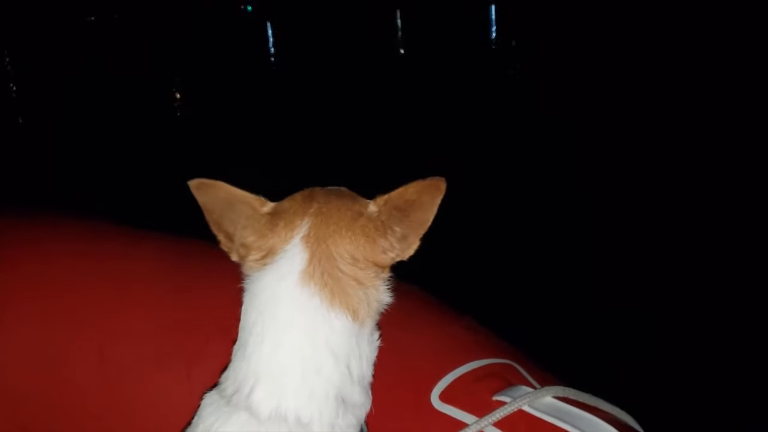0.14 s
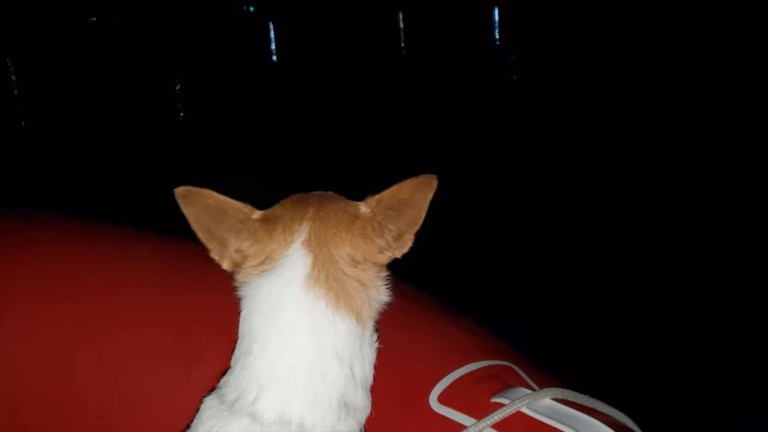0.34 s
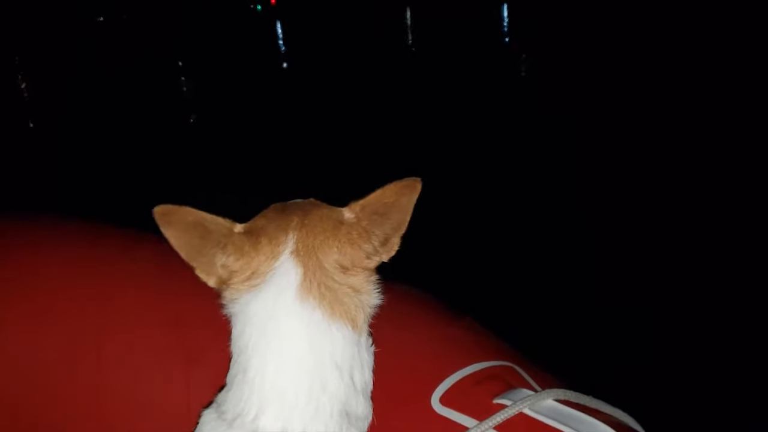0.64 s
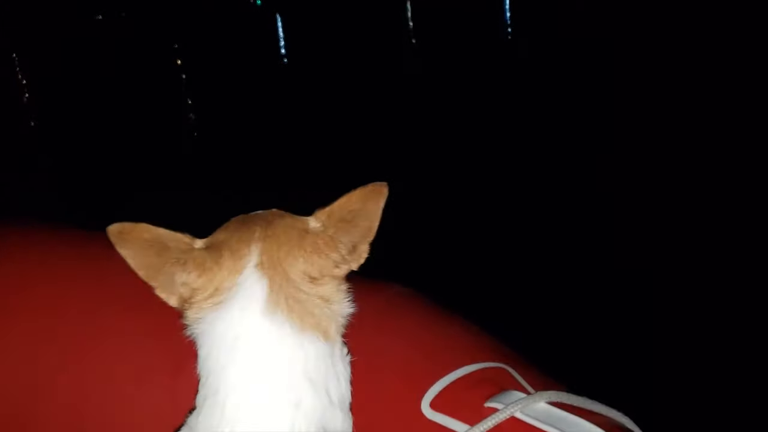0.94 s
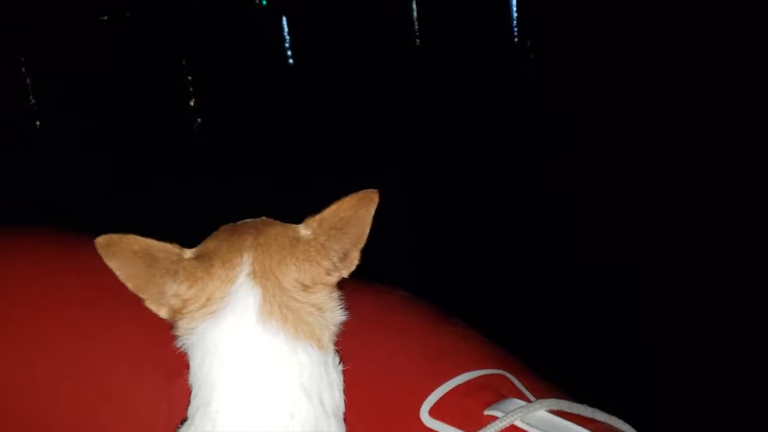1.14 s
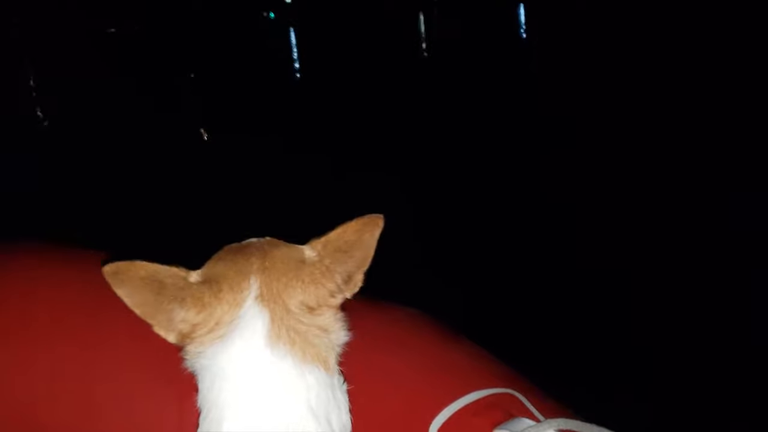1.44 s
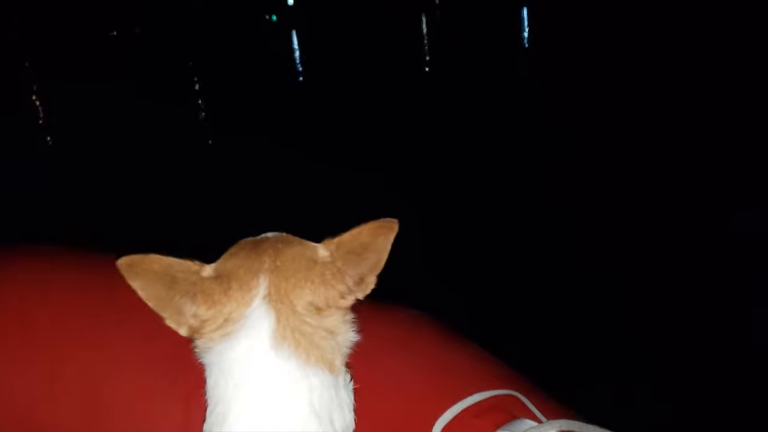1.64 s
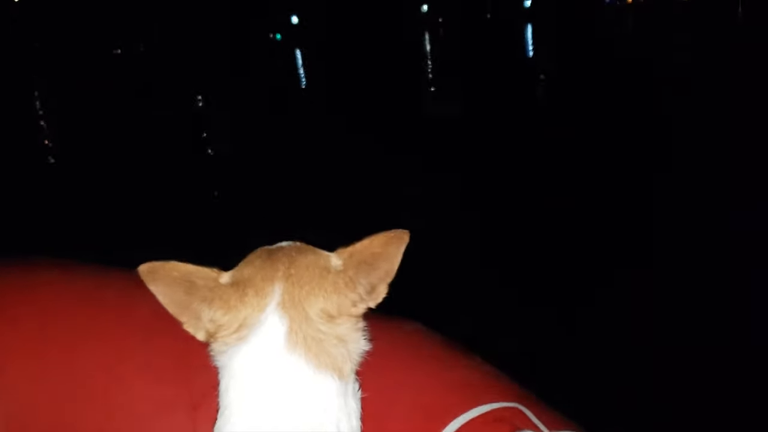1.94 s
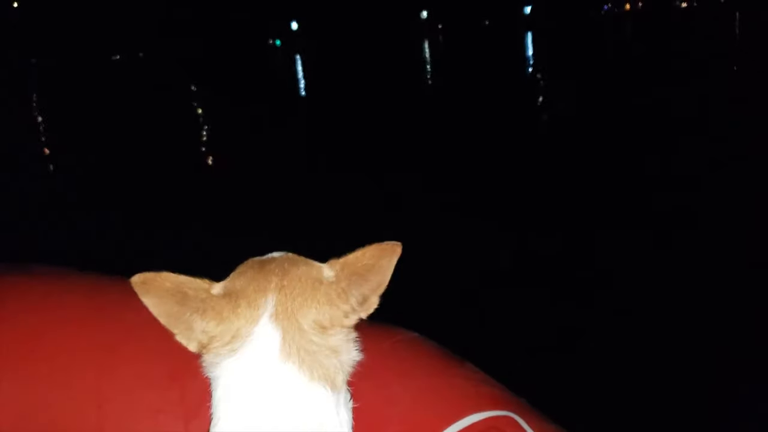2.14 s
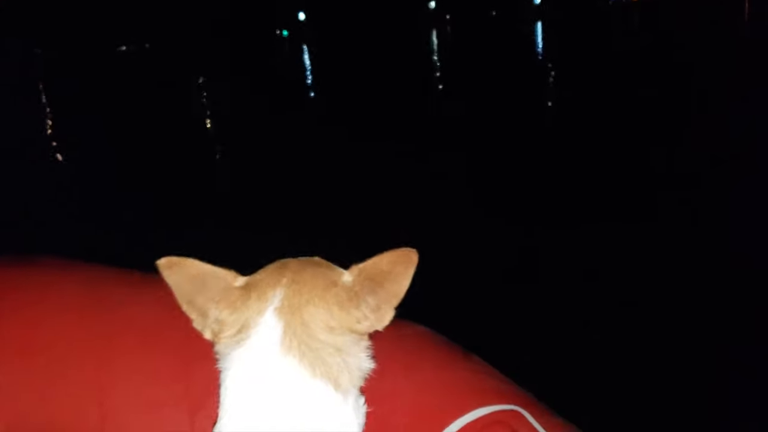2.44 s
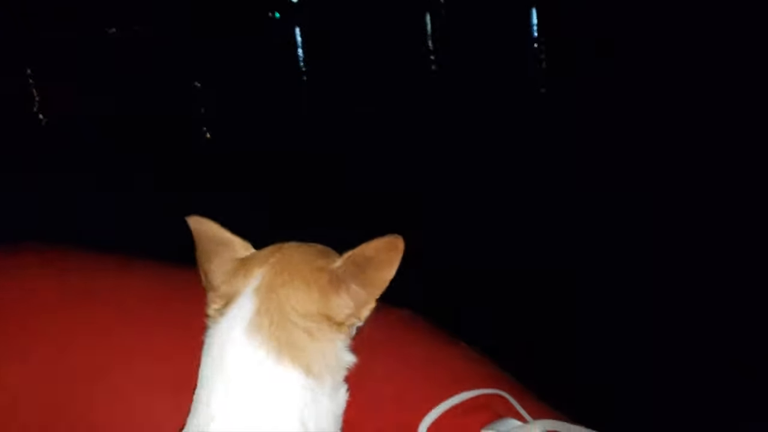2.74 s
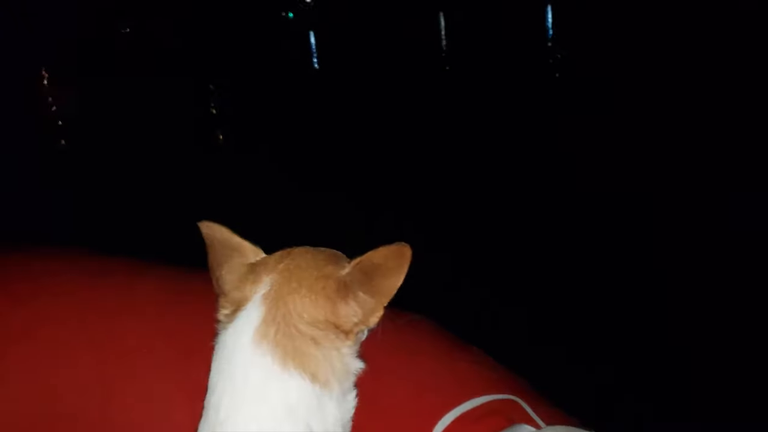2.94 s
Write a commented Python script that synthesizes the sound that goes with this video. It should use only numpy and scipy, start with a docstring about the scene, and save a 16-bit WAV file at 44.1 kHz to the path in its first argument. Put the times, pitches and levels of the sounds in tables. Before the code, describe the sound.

A small outboard motor idles close by, low throbbing putter with light ticking and gurgling water.

```python
"""A small single-cylinder outboard idles behind an inflatable boat at night, stronger on the left. Every cycle
a firing shakes the motor on the transom at multiples of the firing rate and pops an exhaust bubble under water
(damped sines); valves tick (short rings), the intake puffs (gated noise), gears whine (sines locked to the
cycle). Wake noise, fizz and gurgling bubbles run throughout; splashes and large gulps start near 0.4 s. The
idle quickens slightly until 1.4 s, sags to its slowest at 2.15 s and recovers."""
import sys
import numpy as np
from scipy import signal
from scipy.fft import rfft, irfft, next_fast_len
from scipy.io import wavfile
from scipy.ndimage import uniform_filter1d, map_coordinates

SR = 44100
rng = np.random.default_rng(int(sys.argv[2]) if len(sys.argv) > 2 else 0)


def inscribe(sig):
    """Save sig as 16-bit PCM at rate SR to the path in sys.argv[1].

    A 1-D sig is mono; a 2-D sig holds one channel per row.
    Samples are clipped to [-1, 1] before scaling.
    """
    pcm = np.round(np.clip(np.atleast_2d(sig).T, -1, 1) * 32767)
    wavfile.write(sys.argv[1], SR, pcm.astype(np.int16))


N = 136710  # samples


def amp(db):
    """dB to linear gain."""
    return 10 ** (np.asarray(db) / 20)


def unit(x):
    """Scale to RMS 1."""
    return x / np.sqrt(np.mean(x ** 2) + 1e-20)


def along(points, hz):
    """Interpolate (f/Hz, value) points on a log frequency axis."""
    f, v = np.transpose(points)
    return np.interp(np.log(hz + 1), np.log(f + 1), v)


def curve(rows, col, at_s):
    """One column of a table, interpolated at given times."""
    return np.interp(at_s, [r[0] for r in rows], [r[col] for r in rows])


def wobble(rate_hz):
    """Smooth random curve with rate_hz knots a second."""
    knots = rng.standard_normal(int(N * rate_hz / SR) + 4)
    return map_coordinates(knots, [np.arange(N) * rate_hz / SR])


def filtered(x, response):
    """Apply a complex frequency response by FFT."""
    m = next_fast_len(N + SR // 2)
    spectrum = rfft(x, m) * response(np.fft.rfftfreq(m, 1 / SR))
    return irfft(spectrum, m)[..., :N]


def lay(starts_s, shape, length_s):
    """Sum of shape(time since start), one row per start."""
    at = np.ceil(starts_s * SR).astype(int)[:, None] + np.arange(int(length_s * SR))
    rows = shape(at / SR - starts_s[:, None])
    keep = (at >= 0) & (at < N)
    return np.bincount(at[keep], rows[keep], N)


def ring(t, hz, db, t60_s, rise_s):
    """Damped sine: exponential decay with a soft onset."""
    envelope = amp(db - 60 * t / t60_s) * (1 - np.exp(-t / rise_s))
    return envelope * np.sin(2 * np.pi * hz * t)


# idle speed: t/s, rate/(firings per s)
IDLE_SPEED = [(0.0, 21.254), (0.24, 21.369), (0.48, 21.586), (0.72, 21.455), (0.95, 21.534), (1.19, 21.648),
              (1.43, 21.781), (1.67, 21.676), (1.91, 21.372), (2.15, 20.902), (2.38, 21.17), (2.62, 21.417),
              (2.86, 21.488), (3.1, 21.373)]


def cycles():
    """Integrate the firing rate: cycle count per sample, firing times (9 before the start)."""
    t = np.arange(N) / SR
    count = np.cumsum(curve(IDLE_SPEED, 1, t)) / SR
    early = np.arange(-9, 0) / IDLE_SPEED[0][1]
    return count, np.r_[early, np.interp(np.arange(int(count[-1]) + 1), count, t)]


# shaking of the motor rocking on the transom, at multiples of the firing rate: f/(firing rate), t60/cycles,
# level/dB, place/cycle
SHAKE_ORDERS = [(2.77, .9, -17.3, .285), (5.11, 8.6, -24.7, .47), (6.03, 4.1, -21.8, .76),
                (6.47, .86, -18.9, .972)]
# exhaust bubble, varying with its depth in the wake: t/s, f/Hz, level/dB
EXHAUST_POP = [(0, 212, -18.5), (.14, 192, -13.5), (.19, 196, -17), (.33, 203.4, -15.5), (.37, 184, -13.5),
               (.42, 205, -17), (.56, 179.6, -14), (.61, 191, -20.5), (.655, 195, -20.5), (.7, 196, -17.5),
               (.745, 200, -13.5), (.79, 213, -19.5), (.885, 216.4, -14), (.93, 215, -15.5),
               (1.0, 219, -25), (1.12, 210, -14), (1.165, 213.4, -14), (1.21, 231, -20.5), (1.35, 219, -24),
               (1.4, 215.5, -23), (1.58, 211.5, -21.5), (1.63, 213, -24), (1.7, 215, -17),
               (1.8, 206.7, -21.5), (1.86, 219, -15.5), (1.95, 213, -18), (2.0, 221, -16.5),
               (2.09, 198, -16.5), (2.14, 214, -17.5), (2.23, 213.6, -17.5), (2.38, 203, -21.5),
               (2.47, 216, -17), (2.66, 211, -18.5), (2.75, 217.6, -14.5), (2.9, 219, -19),
               (3.1, 204, -20.5)]
# gear tones: f/(firing rate), mean level/dB
GEAR_WHINE = [(14, -50.5), (18, -47), (26, -48.5), (36, -61.5), (39, -60), (49, -59), (98, -63)]
JITTER_S, THUMP_SCATTER_DB = .00006, .6
POP_SCATTER_DB, POP_SCATTER_HZ = .5, 1.5
POP_T60_S, POP_LAG_S, POP_RISE_S = 0.12, .0006, 0.00051
LOW_CUT_HZ, MUFFLE_HZ = 38.6, 285


def engine():
    """Firing shakes the motor at multiples of the firing rate and pops an exhaust bubble; gear tones follow the
    cycle phase."""
    count, fired = cycles()
    luck = rng.standard_normal((len(fired), 4 + len(SHAKE_ORDERS)))
    fired = fired + JITTER_S * luck[:, 0]
    rate_hz = curve(IDLE_SPEED, 1, fired)[:, None]
    out = np.zeros(N)
    for k, (order, t60_cycles, level_db, place) in enumerate(SHAKE_ORDERS):
        db = level_db + THUMP_SCATTER_DB * luck[:, 4 + k, None]
        thump = lambda t: ring(t, order * rate_hz, db, t60_cycles / rate_hz, 1e-6)
        out += lay(fired + place / rate_hz[:, 0], thump, t60_cycles / 27)
    pop_hz = curve(EXHAUST_POP, 1, fired)[:, None] + POP_SCATTER_HZ * luck[:, 1:2]
    pop_db = curve(EXHAUST_POP, 2, fired)[:, None] + POP_SCATTER_DB * luck[:, 2:3]
    out += lay(fired + POP_LAG_S, lambda t: ring(t, pop_hz, pop_db, POP_T60_S, POP_RISE_S), .12)
    out = filtered(out, lambda f: 1 / (1 + (LOW_CUT_HZ / (f + 1)) ** 12) / (1 + (f / MUFFLE_HZ) ** 8))
    for order, db in GEAR_WHINE:
        level = amp(db + 0.72 * wobble(7.79))
        phase = 2 * np.pi * np.round(order) * count + 0.32 * wobble(5)
        out += level * np.sin(phase)
    return out


# left-right likeness of noise: f/Hz, correlation
LIKENESS = [(30, .9), (200, .85), (350, .62), (600, .62), (1100, .58), (2000, .5), (4000, .35), (7000, 0),
            (15000, 0)]


def spread():
    """Mid and side noise mixed by frequency to the tabled correlation; two channels."""
    turn = lambda hz: np.arccos(np.clip(along(LIKENESS, hz), -1, 1)) / 2
    weights = lambda hz: np.array([np.cos(turn(hz)), np.sin(turn(hz))])
    mid, side = filtered(rng.standard_normal((2, N)), weights)
    return unit(np.array([mid + side, mid - side]))


# cowling resonances: f/Hz, width/Hz, lift/dB
COWL_MODES = [(394, 120, 3.5), (605, 43, 3), (791, 148, 5.5), (1068, 110, 6), (1525, 34, 8.5),
              (1628, 53, 8), (1397, 120, 6), (2086, 33, 4), (2300, 120, 2), (2765, 80, 7.5),
              (3270, 600, 4.5), (5290, 330, 5.5), (7800, 170, 5)]


def cowl(hz):
    """Cowling gain: resonance lifts summed in dB."""
    return amp(sum(db / (1 + (2 * (hz - f) / width) ** 2) for f, width, db in COWL_MODES))


# noise bursts once a cycle: place/cycle, rise/s, fall/s, centre f/Hz, width/Hz, level/dB
CYCLE_BURSTS = [(0.03, 0.0032, 0.01, 990, 380, -55.5), (.24, 0.00037, 0.0057, 2040, 1500, -59),
                (0.12, 0.012, 0.019, 3670, 3200, -57.5), (0.28, 0.00085, 0.019, 7030, 2600, -68),
                (0.17, 0.013, 0.031, 11400, 4100, -65.5)]
BURST_SCATTER_DB = 1.5  # also scatters the valve taps


def clatter():
    """Ticks and puffs: band noise through the cowling, gated once a cycle."""
    fired, out = cycles()[1], np.zeros((2, N))
    for place, rise_s, fall_s, hz, width_hz, db in CYCLE_BURSTS:
        size = amp(BURST_SCATTER_DB * rng.standard_normal((len(fired), 1)))
        puff = lambda t: size * (1 - np.exp(-t / rise_s)) * np.exp(-t / fall_s)
        gate = unit(lay(fired + place / curve(IDLE_SPEED, 1, fired), puff, .06))
        band_gain = lambda f: cowl(f) / (1 + (2 * (f - hz) / width_hz) ** 4)
        band = unit(filtered(spread(), band_gain))
        out += amp(db) * gate * band
    return out


# valve taps: place/cycle, f/Hz, t60/s, mean level/dB
VALVE_TAPS = [(0.04, 1073, 0.024, -45), (.26, 1033, 0.019, -44), (.25, 1540, .015, -43),
              (.25, 2170, .012, -52), (0.5, 8800, 0.0069, -64)]


def taps():
    """Valve gear ringing briefly near set places in the cycle, as damped sines."""
    fired, out = cycles()[1], np.zeros(N)
    for place, hz, t60_s, db in VALVE_TAPS:
        luck = rng.standard_normal((len(fired), 2))
        starts_s = fired + place / curve(IDLE_SPEED, 1, fired) + .0001 * luck[:, 0]
        out += lay(starts_s, lambda t: ring(t, hz, db + BURST_SCATTER_DB * luck[:, 1:], t60_s, 0.00033), .04)
    return out


# large bubbles: t/s, level/dB, f/Hz
LARGE_BUBBLES = [(.43, -34, 410), (.56, -36, 445), (.92, -41, 340), (1.889, -33, 337), (2.55, -38, 414)]


def gulps():
    """A few large low bubbles, each a damped sine with a slow onset."""
    s, db, hz = np.transpose(LARGE_BUBBLES)
    return lay(s, lambda t: ring(t, hz[:, None], db[:, None], .12, .008), .12)


def bubbles(count, hz, turns, db):
    """Random bubbles: damped sines rising in pitch, decay time set in turns of the pitch."""
    luck = rng.random((count, 3))
    pitch_hz = hz * np.exp(0.8 * (luck[:, 1:2] - .5))
    size = amp(-3 * np.log(1 - luck[:, 2:3] * .95))
    rising_hz = lambda t: pitch_hz * (1 + .1 * t * pitch_hz / turns)
    shape = lambda t: size * ring(t, rising_hz(t), 0, 3 * turns / pitch_hz, 1 / pitch_hz)
    return amp(db) * unit(lay(luck[:, 0] * N / SR, shape, 4 * turns / hz))


# wash spectrum before cowling and 255 Hz low cut: f/Hz, relative level/(dB per Hz)
WASH_SPECTRUM = [(150, -32), (260, -6), (330, -7.5), (498, -8), (562, -10), (644, -16), (1060, -17.5),
                 (1210, -18.5), (1590, -21), (1890, -21.5), (2320, -21.5), (6060, -42), (15500, -72.5)]
# rumble spectrum: f/Hz, relative level/(dB per Hz)
RUMBLE_SPECTRUM = [(5, -20), (25, -28), (40, -5.5), (90, -0.5), (150, -3), (200, -1.5), (250, 2.5),
                   (300, -42)]
# single splashes: t/s, level/dB, starting f/Hz
SPLASH_DROPS = [(.3845, -43, 2060), (0.7553, -35, 1560), (1.7797, -30, 2430), (1.8053, -31.5, 2700),
                (1.9589, -40, 2490), (2.243, -34, 1610), (2.6224, -38, 1530), (2.762, -31, 1590),
                (2.808, -31, 1630)]
WASH_DB, RUMBLE_DB = -42.5, -39.5
GURGLE_HZ, GURGLE_DB, FIZZ_HZ, FIZZ_DB = 395.5, -49.5, 2900, -62


def water():
    """Wash and rumble as shaped noise; gurgles, fizz and splashes as rising damped sines."""
    z = signal.stft(spread(), nperseg=512)[2]
    # random level patches, smoothed over frequency then time
    field = uniform_filter1d(rng.standard_normal(z.shape[1:]), 6, 0)
    field = uniform_filter1d(field, 10, 1)
    patchy = signal.istft(z * amp(.6 * unit(field)), nperseg=512)[1][:, :N]
    wash_gain = lambda hz: (hz > 255) * cowl(hz) * amp(along(WASH_SPECTRUM, hz))
    wash = amp(WASH_DB) * unit(filtered(patchy, wash_gain))
    rumble_noise = unit(filtered(spread(), lambda hz: amp(along(RUMBLE_SPECTRUM, hz))))
    rumble = amp(RUMBLE_DB + 1.15 * wobble(5.78)) * rumble_noise
    s, db, hz = np.transpose(SPLASH_DROPS)
    drops = lay(s, lambda t: ring(t, hz[:, None] * (1 + 6 * t), db[:, None], 0.016, 0.0008), .03)
    fizz = np.array([bubbles(count=900, hz=FIZZ_HZ, turns=5.3, db=FIZZ_DB) for _ in range(2)])
    gurgle = bubbles(count=200, hz=GURGLE_HZ, turns=6, db=GURGLE_DB)
    return wash + rumble + fizz + drops + gurgle


# treble swell, used relative to its mean: t/s, level/dB
TREBLE_SWELL = [(0.0, -62.5), (0.2, -61.5), (1.66, -60), (2.19, -62), (3.05, -59)]


def scene():
    """Sum of all sources; the non-engine treble swells slowly."""
    noise = clatter() + taps() + water() + gulps()
    high = filtered(noise, lambda hz: 1 / (1 + (3500 / (hz + 1)) ** 4))
    swell_db = curve(TREBLE_SWELL, 1, np.arange(N) / SR)
    return engine() + noise + high * (amp(swell_db - swell_db.mean()) - 1)


# left port over right: f/Hz, level/dB
LEFT_OVER_RIGHT = [(60, 5.5), (140, 6.5), (330, 8.5), (1170, 10.5), (2000, 9), (2950, 3), (3500, 9.5),
                   (5200, 9), (5800, 28.5), (8600, 28), (9300, 2), (11500, 1), (13500, 6)]
# phase of left port ahead of right: f/Hz, phase/rad
LEFT_PHASE = [(30, -.06), (60, -.09), (120, -.18), (210, -.36), (330, -.6), (600, -.5), (1120, -3),
              (2330, -1.9), (3010, -4.6), (4130, -.7)]
TOP_HZ = 15700


def record(dry):
    """Two ports differing in level and phase by frequency, the right one shaded; band limit."""
    def ports(hz):
        right = amp(-along(LEFT_OVER_RIGHT, hz))
        lead = np.exp(.5j * along(LEFT_PHASE, hz))  # half the phase on each port
        band = (hz < TOP_HZ) * (hz > 3)
        return np.array([lead, right / lead]) * 2 / (1 + right) * band
    return filtered(dry, ports)


dry = scene()
out = record(dry)
inscribe(out)
```